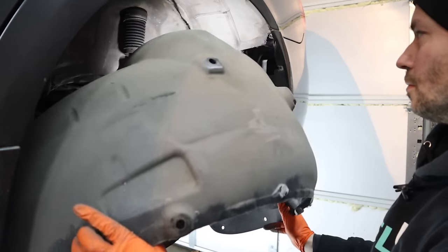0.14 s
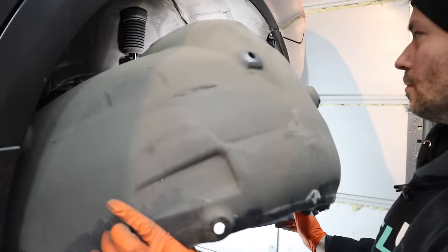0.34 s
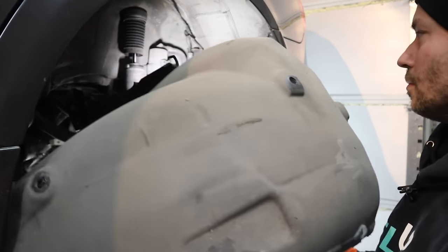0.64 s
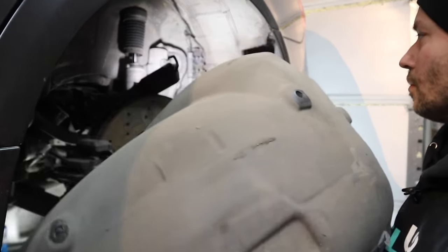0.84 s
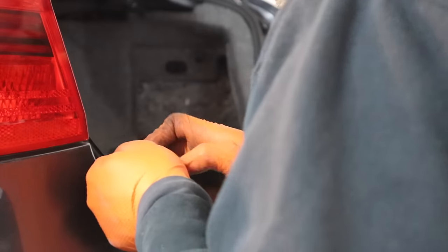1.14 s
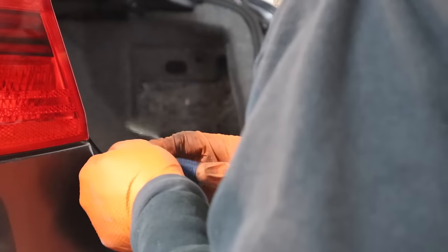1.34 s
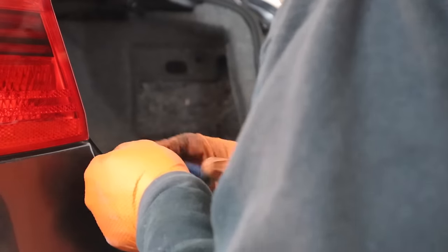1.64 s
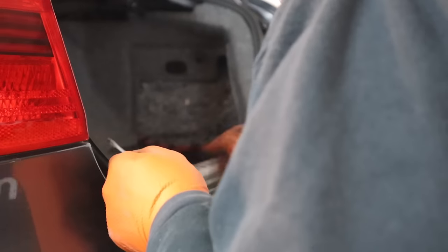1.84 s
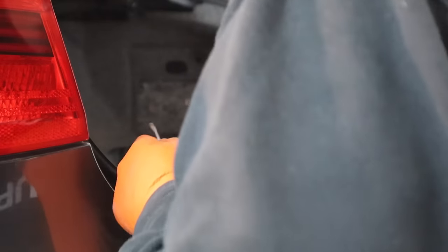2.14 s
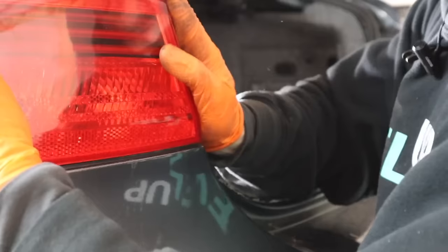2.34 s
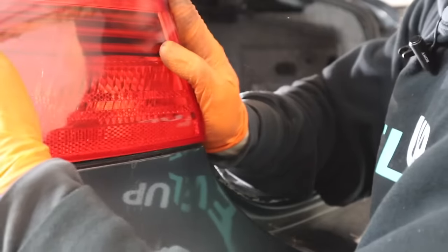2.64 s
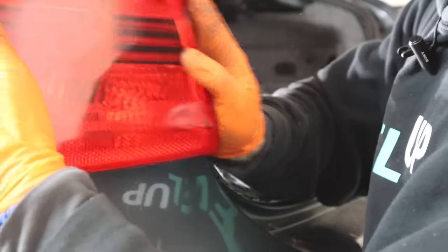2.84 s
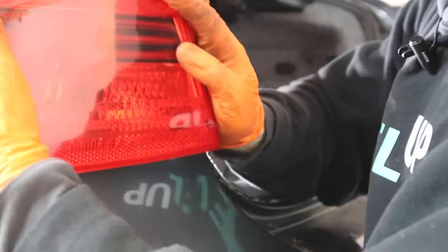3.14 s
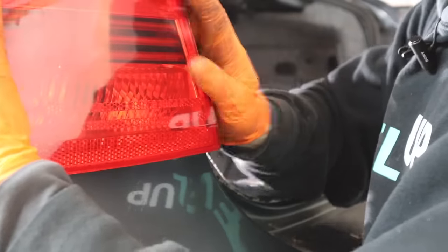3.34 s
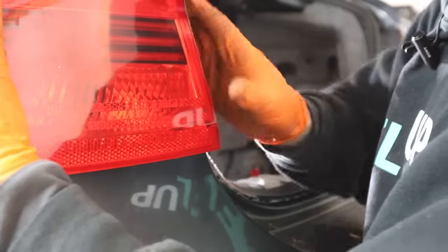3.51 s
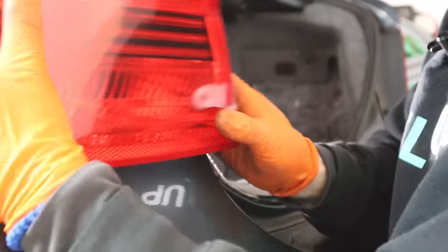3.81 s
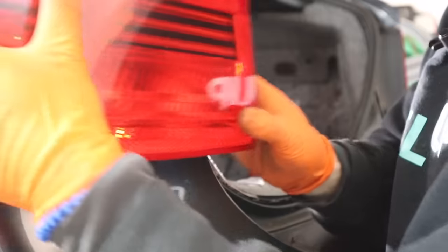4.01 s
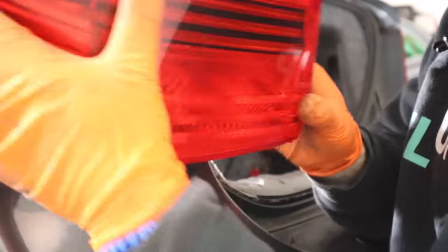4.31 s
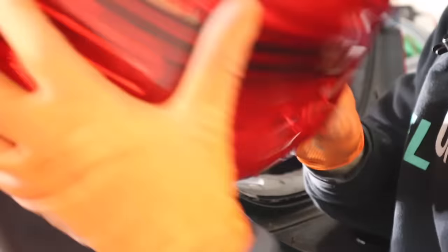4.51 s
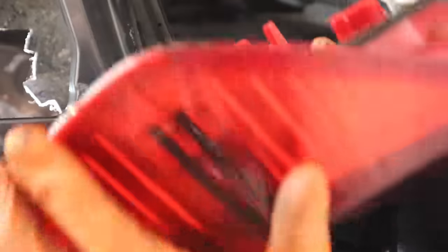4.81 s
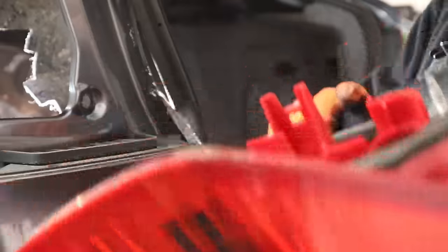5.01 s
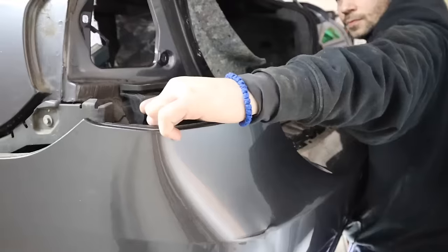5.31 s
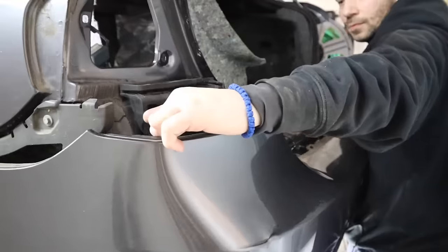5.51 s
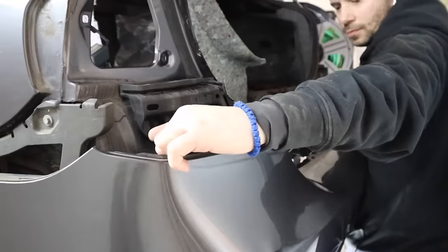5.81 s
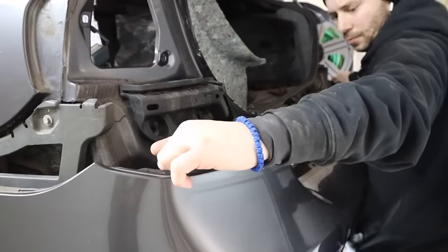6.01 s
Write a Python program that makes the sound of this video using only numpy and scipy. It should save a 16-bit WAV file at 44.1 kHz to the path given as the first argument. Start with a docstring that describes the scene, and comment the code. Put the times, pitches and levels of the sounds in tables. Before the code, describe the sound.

Plastic car parts come off in a garage: floppy thumps and scrapes, a burst of sharp snaps, then hollow knocking, creaking and soft sliding.

```python
"""Plastic parts coming off a car

Three separate moments in a garage. A floppy wheel-arch liner is dragged out, bumping and scraping the
steel wing. Trim clips are prised open with loud snaps. A hollow tail lamp is rocked loose, knocks in
its seat and slides out. Each contact rings the plastic; rubbing is a stream of tiny slips."""
import sys
import numpy as np
from scipy import signal
from scipy.fft import rfft, irfft, next_fast_len
from scipy.io import wavfile

SR = 44100
rng = np.random.default_rng(int(sys.argv[2]) if len(sys.argv) > 2 else 0)


def bounce(signal):
    """Save signal as a 16-bit WAV file at the path given by the first command-line argument."""
    frames = np.transpose(np.atleast_2d(signal))
    limited = np.clip(frames, -1, 1)
    pcm = np.round(limited * 32767).astype(np.int16)
    wavfile.write(sys.argv[1], SR, pcm)


N = 271213
TIME = np.arange(N) / SR
RING_TIME = TIME[:SR * 3 // 4]
CUTOFF_HZ = 16000


def from_db(db):
    """Decibels to gain."""
    return 10 ** (np.asarray(db) / 20)


def unit_rms(x):
    """Scale to rms 1."""
    return x / np.sqrt(np.mean(x ** 2) + 1e-20)


def at_level(x, db):
    """Scale a short sound so its energy, spread over 20 ms, has this level."""
    return x * from_db(db) * np.sqrt(.02 * SR / np.sum(x ** 2))


def at_hz(curve, hz):
    """Read a curve on a log-frequency axis."""
    known_hz, values = np.transpose(curve)
    return np.interp(np.log(np.maximum(hz, 1)), np.log(known_hz), values)


def add(track, start_s, sound):
    """Mix a sound in at start_s."""
    start = round(start_s * SR)
    track[start:start + len(sound)] += sound[:N - start]


def butter(x, hz, kind, order):
    """Causal Butterworth filter."""
    return signal.sosfilt(signal.butter(order, hz, kind, fs=SR, output="sos"), x + 1e-18)


def coloured(x, spectrum):
    """Minimum-phase filter to a spectrum: nothing sounds early."""
    size = 2 * next_fast_len(len(x))
    cepstrum = irfft(np.log(from_db(at_hz(spectrum, np.fft.rfftfreq(size, 1 / SR)))))
    cepstrum[1:size // 2] *= 2
    cepstrum[size // 2 + 1:] = 0
    return irfft(rfft(x, size) * np.exp(rfft(cepstrum)))[:len(x)]


def drift(rate_hz):
    """Random wavering, rms 1."""
    return unit_rms(butter(rng.standard_normal(N + SR), rate_hz, "low", order=2)[SR:])


def decay(t60_s, hold_s=0):
    """Exponential decay after a level start."""
    return np.exp(-np.log(1000) * np.maximum(RING_TIME - hold_s, 0) / t60_s)


def dense_ring(t60_curve):
    """Countless overlapping modes: noise whose octaves die at their own rates; energy 1."""
    size = len(RING_TIME)
    white = rfft(rng.standard_normal(size))
    octave = np.ceil(np.log2(np.maximum(np.fft.rfftfreq(size, 1 / SR), 128)))
    ring = sum(irfft(white * (octave == k), size) * decay(at_hz(t60_curve, 2 ** (k - .5)))
               for k in np.unique(octave))
    return ring / np.linalg.norm(ring)


def modal_ring(modes, pitch_ratio=1):
    """Damped sines; neighbouring modes swing in opposite directions."""
    return sum((-1) ** k * from_db(db) * decay(t60_s) * np.sin(2 * np.pi * hz * pitch_ratio * RING_TIME)
               for k, (hz, db, t60_s) in enumerate(modes))


def resonate(x, response):
    """Drive a body or space, its impulse response scaled to energy 1."""
    return signal.fftconvolve(x, response / np.linalg.norm(response))[:N]


def friction(slips_per_s, spread_db):
    """Tiny random slips over a smooth hiss; rms 1."""
    sizes = from_db(spread_db * np.minimum(rng.exponential(1, N), 4)) * rng.choice([-1, 1], N)
    slips = sizes * (rng.random(N) < slips_per_s / SR)
    return unit_rms(unit_rms(slips) + .5 * rng.standard_normal(N))


def stroke(start_s, length_s, rise_share):
    """Pressure of one stroke, 0-1, with a rounded top."""
    corners_s = start_s + length_s * np.array([0, rise_share, 1])
    return np.sin(np.pi / 2 * np.interp(TIME, corners_s, [0, 1, 0]))


# freq_hz, gain_db
BACKGROUND_SPECTRUM = [(18, -52), (30, -0.5), (209, -5), (392, -8), (645, -9.5), (1660, -12), (15800, -19)]


def background(level_db=-56.5):
    """Faint steady hiss."""
    hiss = coloured(rng.standard_normal(N), BACKGROUND_SPECTRUM)
    return from_db(level_db) * unit_rms(butter(hiss, CUTOFF_HZ, "low", order=8))


# freq_hz, t60_s
GARAGE_DECAY = [(100, 1), (400, 0.44), (2000, 0.36), (6000, 0.38), (14000, 0.22)]


def garage(x, wet_db, build_s=0.0066):
    """Reflections from car and walls thicken, then die away."""
    echoes = dense_ring(GARAGE_DECAY) * (1 - np.exp(-(RING_TIME / build_s) ** 2))
    return from_db(wet_db) * signal.fftconvolve(x, echoes)[:N]


def peaked(x, hz, q):
    """One resonance."""
    return signal.lfilter(*signal.iirpeak(hz, q, fs=SR), x + 1e-18)


# start_s, level_db, pitch_hz, q
TOOL_TICKS = [(0.264, -51, 4700, 2), (1.217, -44.5, 1130, 1.5), (1.332, -47.5, 1490, 0.79),
              (2.391, -41, 2700, 2.4), (2.589, -55, 2660, 3.6), (2.796, -43.5, 3800, 0.89),
              (3.559, -53, 2460, 0.7)]


def ticks(crack_db=-15, top_db=4.5, t60_s=0.086):
    """Tool tip and edges click: a sharp contact, a bright top, one short resonance."""
    out = np.zeros(N)
    for start_s, level_db, hz, q in TOOL_TICKS:
        click = from_db(crack_db) * (RING_TIME == 0) + dense_ring([(hz, t60_s)])
        tick = unit_rms(peaked(click, hz, q)) + from_db(top_db) * unit_rms(click)
        add(out, start_s, at_level(tick, level_db))
    return out + garage(out, wet_db=-2)


# start_s, level_db
CATCH_SLIPS = [(2.489, -38), (2.804, -39), (4.523, -61)]


def pings(events, pitch_hz, q, t60_s):
    """A slipping catch or the prying tool rings in one noisy band."""
    out = np.zeros(N)
    for start_s, level_db in events:
        ring = peaked(dense_ring([(pitch_hz, t60_s)]), pitch_hz, q)
        add(out, start_s, at_level(ring, level_db))
    return out


# start_s, length_s, level_db, pitch_hz
SLIDE_SQUEAKS = [(4.51, 0.045, -53.5, 4450), (5.12, 0.045, -57.5, 3050)]


def squeaks(glide_share=0.06, jitter_share=0.035):
    """Sliding plastic sticks and slips fast enough for a rough, slightly rising note."""
    out = np.zeros(N)
    for start_s, length_s, level_db, hz in SLIDE_SQUEAKS:
        glide = glide_share * np.clip((TIME - start_s) / length_s - .5, -.5, .5)
        pitch_hz = hz * (1 + glide + jitter_share * drift(rate_hz=350))
        note = unit_rms(np.sin(2 * np.pi * np.cumsum(pitch_hz) / SR))
        out += from_db(level_db) * stroke(start_s, length_s, rise_share=0.5) * note
    return out


# freed lamp shell: freq_hz, gain_db, t60_s
SHELL_MODES = [(365, -2, 0.2), (475, -3, 0.18), (620.5, -4, 0.06), (850, -3, 0.05), (1500, -5, 0.012)]
# shell hum: time_s, level_db
SLIDE_LEVELS = [(4.25, -85), (4.51, -49.5), (4.6, -56), (4.668, -56), (4.812, -71), (4.86, -45),
                (4.92, -50.5), (5.144, -52), (5.22, -74)]


def lamp_slide(hiss_db=-3.5, jerk_db=1.0, detune_share=0.052):
    """Jerky pulls with a light hiss; the hollow shell hums, wavering as the grip shifts."""
    grain = friction(slips_per_s=700, spread_db=0)
    warped_s = TIME + np.cumsum(detune_share * drift(rate_hz=11)) / SR
    hum = unit_rms(np.interp(warped_s, TIME, resonate(grain, modal_ring(SHELL_MODES))))
    hiss = unit_rms(butter(grain, [2700, 5800], "band", order=1))
    pull_db = np.interp(TIME, *np.transpose(SLIDE_LEVELS), left=-np.inf, right=-np.inf)
    pull_db += jerk_db * drift(rate_hz=15)
    return from_db(pull_db) * (hum + from_db(hiss_db) * hiss)


# freq_hz, gain_db, t60_s
LAMP_RIM_MODES = [(1240, -1, 0.073), (1666, -6, 0.075), (2700, -3, 0.015), (3900, -8, 0.012)]
# start_s, length_s, level_db, slips_per_s
RIM_CREAKS = [(2.466, 0.14, -50.5, 60), (2.816, 0.022, -31, 207), (2.86, 0.045, -37, 72)]


def creaks():
    """The lamp's rim sticks and slips on its seat: runs of uneven jerks ring its modes."""
    out, rim = np.zeros(N), modal_ring(LAMP_RIM_MODES)
    for start_s, length_s, level_db, slips_per_s in RIM_CREAKS:
        jerk = rim * np.sqrt(SR / slips_per_s / np.sum(rim ** 2))
        gaps_s = rng.uniform(.6, 1.4, 64) / slips_per_s
        sizes_db = rng.normal(0, 3, 64)
        for after_s, size_db in zip(np.cumsum(gaps_s) - gaps_s[0], sizes_db):
            if after_s < length_s:
                add(out, start_s + after_s, from_db(level_db + size_db) * jerk)
    return out


# freq_hz, gain_db
RUB_SPECTRUM = [(60, 14), (400, 13.5), (900, 7), (1600, 6), (3200, 1), (6000, -4), (10000, -4.5),
                (16000, -1)]


def rubs(strokes, rise_share, slips_per_s, spread_db, edge_ratio):
    """Friction strokes swell and fade; a faster stroke centres higher."""
    out = np.zeros(N)
    grain = coloured(friction(slips_per_s, spread_db), RUB_SPECTRUM)
    for start_s, length_s, level_db, centre_hz in strokes:
        band = butter(grain, [centre_hz / edge_ratio, centre_hz * edge_ratio], "band", order=1)
        out += from_db(level_db) * stroke(start_s, length_s, rise_share) * unit_rms(band)
    return out


# freq_hz, t60_s
PLASTIC_DECAY = [(150, 0.14), (1000, 0.14), (4000, 0.05), (14000, 0.072)]


def impacts(hits, spectrum, body_ring, crack_db, swell_s, t60_scale=1):
    """Contacts on plastic: clacks (a crack plus dense modes) and thumps of the whole part."""
    clacks, thumps = np.zeros((2, N))
    crack = from_db(crack_db) * butter(1. * (RING_TIME == 0), 3000, "low", order=1)
    swell = 1 - np.exp(-RING_TIME / swell_s)   # bending waves take a moment to fill the part
    t60_curve = [(hz, t60_s * t60_scale) for hz, t60_s in PLASTIC_DECAY]
    for start_s, clack_db, lowpass_hz, thump_db, tuning in hits:
        clack = coloured(crack + swell * dense_ring(t60_curve), spectrum)
        clack = butter(clack, lowpass_hz, "low", order=2)   # a soft contact is dull
        add(clacks, start_s, at_level(clack, clack_db))
        add(thumps, start_s, at_level(body_ring(tuning), thump_db))
    return clacks, thumps


# seated lamp: freq_hz, gain_db, t60_s
HOUSING_MODES = [(120, -6, 0.16), (178, -6, 0.08), (226, 0, 0.11), (290, -3, 0.07), (368, 1, 0.12),
                 (455, -1, 0.09), (590, -3, 0.05), (730, -2, 0.07)]


def housing_ring(spot_hz, db_per_octave=11, detune_octaves=0.08):
    """The knocked spot favours modes near spot_hz; the grip detunes them."""
    modes = [(hz, db - db_per_octave * abs(np.log2(hz / spot_hz)), t60_s)
             for hz, db, t60_s in HOUSING_MODES]
    return modal_ring(modes, 2 ** (detune_octaves * rng.standard_normal()))


# clacks: freq_hz, gain_db
LAMP_SPECTRUM = [(50, -12), (150, 1.5), (450, -4), (950, -4.5), (1600, -1.5), (2800, -3.5), (5000, -2),
                 (16000, -29)]
# lamp and gloves on the body: start_s, length_s, level_db, centre_hz
LAMP_STROKES = [(2.20, 0.15, -44, 2640), (2.36, 0.35, -42, 1340), (2.775, 0.21, -38.5, 2640),
                (2.925, 0.065, -38.5, 4350), (3.06, 0.12, -41.5, 3500), (3.32, 0.16, -46, 2980),
                (3.64, 0.14, -51.5, 3730), (3.80, 0.29, -46, 1970)]
# start_s, clack_db, lowpass_hz, thump_db, spot_hz
LAMP_KNOCKS = [(2.315, -43, 890, -37.5, 170), (2.490, -43.5, 2400, -37, 190),
               (2.598, -40, 1730, -42.5, 330), (2.725, -29.5, 3000, -28, 367),
               (2.835, -28.5, 1500, -28, 344), (2.897, -23, 2170, -18.5, 463),
               (2.910, -27.5, 890, -16.5, 193), (2.962, -36.5, 3000, -27, 466),
               (3.023, -40.5, 1500, -35.5, 477), (3.066, -33, 1380, -24.5, 194),
               (3.111, -35, 1880, -29, 256), (3.125, -38, 1880, -25.5, 213), (3.233, -31, 890, -26, 483),
               (3.246, -33.5, 600, -23, 189)]


def lamp_rocking():
    """Rocked by hand, the housing rubs, creaks and knocks in its seat; once free it rings higher."""
    contact = dict(spectrum=LAMP_SPECTRUM, crack_db=-6, swell_s=0.00078)
    seated = impacts(LAMP_KNOCKS, body_ring=housing_ring, **contact)
    last_knock = (4.03, -38.5, 1400, -35, 1)   # start_s, clack_db, lowpass_hz, thump_db, pitch_ratio
    free = impacts([last_knock], body_ring=lambda ratio: modal_ring(SHELL_MODES, ratio), **contact)
    clacks, thumps = np.add(seated, free)
    drag = rubs(LAMP_STROKES, rise_share=0.55, slips_per_s=260, spread_db=3.2, edge_ratio=1.8)
    hum = from_db(-13) * resonate(drag, modal_ring(HOUSING_MODES))
    near = clacks + drag + creaks() + hum
    return near + thumps + garage(near + from_db(-8) * thumps, wet_db=-7)


def flexed(hits, base_ratio, octaves_per_db):
    """Append a pitch ratio: the more a hit thumps, the more of the part flexes and the deeper it rings."""
    return [(start_s, clack_db, hz, thump_db, base_ratio * 2 ** (octaves_per_db * (clack_db - thump_db)))
            for start_s, clack_db, hz, thump_db in hits]


def rebounds(hits, after_s, gain_db, weight_db, sag_ratio):
    """The part falls back once per hit, duller and deeper, its thump capped by its own weight."""
    falls = []
    for start_s, clack_db, lowpass_hz, thump_db, pitch_ratio in hits:
        change_db = min(gain_db, weight_db - thump_db)
        fall_s = start_s + after_s * rng.uniform(.8, 1.2)
        falls.append((fall_s, clack_db + change_db, lowpass_hz * sag_ratio,
                      thump_db + change_db, pitch_ratio * sag_ratio))
    return falls


# liner sheet: base_hz, gain_db, t60_s
SHEET_MODES = [(148.3, -9.5, 0.17), (249.4, -2, 0.094), (292.3, -2, 0.2), (341, 5.5, 0.05),
               (425, -8, 0.062), (750, -27, 0.12)]
# freq_hz, gain_db, t60_s
STEEL_WING_MODES = [(334, -2, 0.45), (528, -1, 0.52), (845, -9, 0.3), (1222, -6, 0.3), (1432, -4, 0.3),
                    (1674, -5, 0.65), (1938, -2, 0.25), (3171, -11, 0.2)]
# clacks: freq_hz, gain_db
LINER_SPECTRUM = [(50, -8.5), (200, -1), (550, -2), (950, -8), (1700, -5), (3000, -7), (5000, -9),
                  (9000, -16), (16000, -43)]
# scrapes on the wing: start_s, length_s, relative_db, centre_hz
LINER_STROKES = [(0.0, 0.25, -48.5, 2500), (0.371, 0.065, -32.5, 1600), (0.378, 0.11, -32, 3230),
                 (0.703, 0.08, -40.5, 2370)]
# start_s, clack_db, lowpass_hz, thump_db
LINER_BUMPS = [(0.003, -41.5, 1400, -42), (0.064, -38.5, 3660, -43), (0.146, -40, 1260, -35.5),
               (0.202, -33.5, 1390, -27.5), (0.343, -40.5, 1670, -53), (0.432, -25.5, 2570, -26),
               (0.624, -23.5, 1730, -13.5), (0.750, -33.5, 4400, -43), (0.797, -26, 2250, -32.5),
               (0.934, -43.5, 1500, -35), (0.955, -48.5, 800, -39.5)]


def liner(end_s=0.982, fade_s=0.013):
    """The loose sheet bumps, drags and shakes; its edge scrapes and flicks the wing, which rings on."""
    bumps = flexed(LINER_BUMPS, base_ratio=1.03, octaves_per_db=0.007)
    bumps += rebounds(bumps, after_s=0.02, gain_db=-2, weight_db=-33, sag_ratio=0.566)
    clacks, thumps = impacts(bumps, LINER_SPECTRUM, lambda ratio: modal_ring(SHEET_MODES, ratio),
                             crack_db=-5.5, swell_s=0.00085)
    rasp = rubs(LINER_STROKES, rise_share=0.12, slips_per_s=760, spread_db=4, edge_ratio=2)
    drag = from_db(-2) * (rasp + resonate(rasp, dense_ring(PLASTIC_DECAY)))
    shaking = rng.standard_normal(len(RING_TIME)) * decay(t60_s=1)
    flutter = from_db(-15) * resonate(butter(rasp, 2200, "low", order=2), shaking)
    wing = modal_ring(STEEL_WING_MODES)
    near = clacks + drag + flutter + from_db(-17.5) * resonate(drag, wing)
    add(near, start_s=0.432, sound=at_level(wing, db=-25.5))   # the flick
    heard = near + thumps + garage(near + from_db(-9) * thumps, wet_db=-5)
    return heard * np.clip((end_s - TIME) / fade_s, 0, 1)


# trim around a clip: base_hz, gain_db, t60_s
PANEL_MODES = [(118, -9.5, 0.51), (180.7, 0.5, 0.22), (280.4, 8, 0.13), (337.2, 6, 0.092), (472, 6, 0.16)]
# clacks: freq_hz, gain_db
CLIP_SPECTRUM = [(40, -48.5), (130, -14), (280, -7.5), (700, -3.5), (1100, -4), (1900, -1.5), (3200, -0.5),
                 (5000, -5.5), (9000, -5.5), (16000, -7.5)]
# start_s, clack_db, lowpass_hz, thump_db, pitch_ratio
CLIP_SNAPS = [(1.363, -21.5, 13100, -24, 0.81), (1.378, -20.5, 13900, -26, 0.71),
              (1.402, -23, 9000, -26, 1.0), (1.583, -20.5, 3200, -20.5, 1.96),
              (1.610, -25, 1960, -27.5, 0.95), (1.716, -23.5, 3200, -29.5, 0.96),
              (1.784, -31, 1600, -42, 0.95), (1.849, -30, 2050, -34, 0.86)]


def clips():
    """Clips snap out of the body and chatter; the open boot throws the sound straight back."""
    clacks, thumps = impacts(CLIP_SNAPS, CLIP_SPECTRUM, lambda ratio: modal_ring(PANEL_MODES, ratio),
                             crack_db=-11.5, swell_s=0.0016, t60_scale=0.51)
    boot = rng.standard_normal(len(RING_TIME)) * decay(t60_s=0.092, hold_s=0.014)
    reflections = from_db(-4.5) * resonate(clacks, boot)
    return clacks + thumps + reflections + garage(clacks + from_db(-11) * thumps, wet_db=-1)


def scene():
    """Liner, clips and lamp in turn over faint hiss; mono."""
    parts = background() + liner() + clips() + lamp_rocking() + ticks()
    catches = pings(CATCH_SLIPS, pitch_hz=3900, q=6.2, t60_s=0.042)
    tool = pings([(1.85, -36.5)], pitch_hz=6400, q=3.6, t60_s=0.34)   # as the last clip gives
    return (parts + catches + tool + lamp_slide() + squeaks())[None]


def record(dry):
    """Cut the deepest bass and the top."""
    lowpass = signal.ellip(10, .1, 80, CUTOFF_HZ, fs=SR, output="sos")
    return signal.sosfilt(lowpass, butter(dry, 44, "high", order=3))


dry = scene()
out = record(dry)
bounce(out)
```